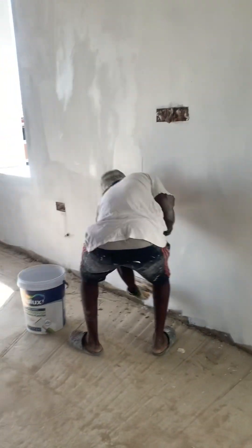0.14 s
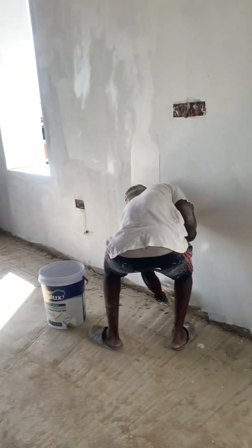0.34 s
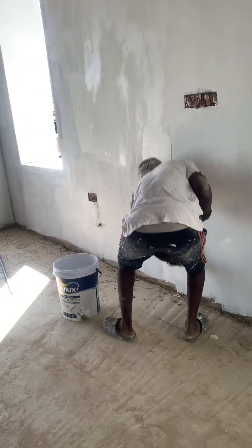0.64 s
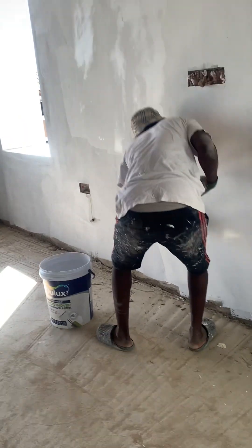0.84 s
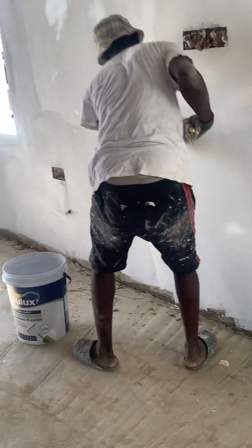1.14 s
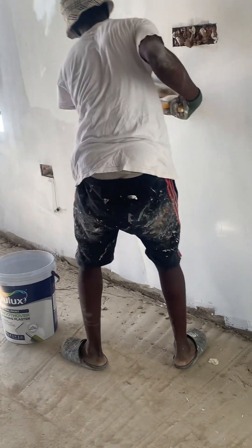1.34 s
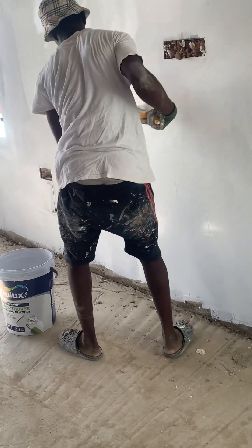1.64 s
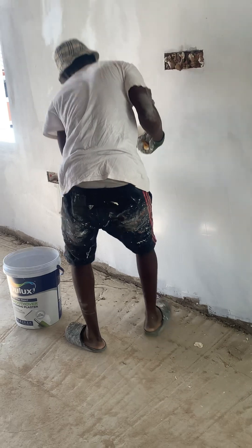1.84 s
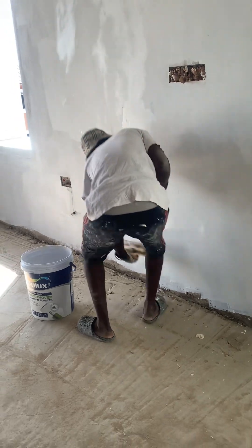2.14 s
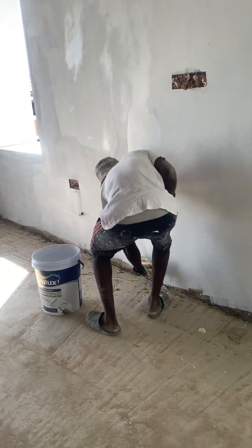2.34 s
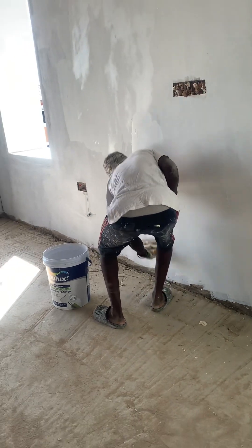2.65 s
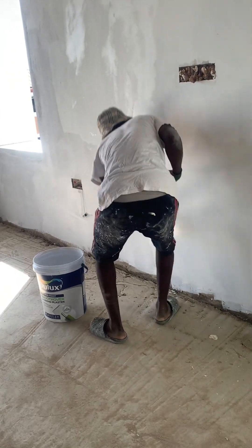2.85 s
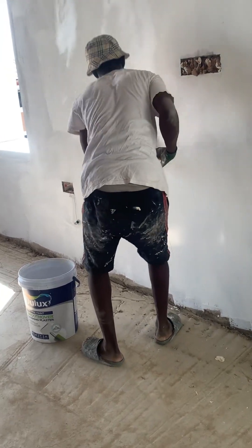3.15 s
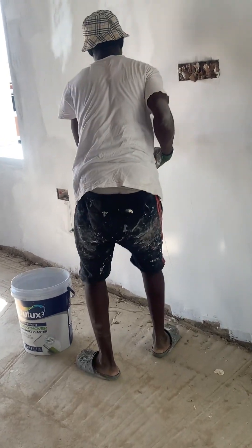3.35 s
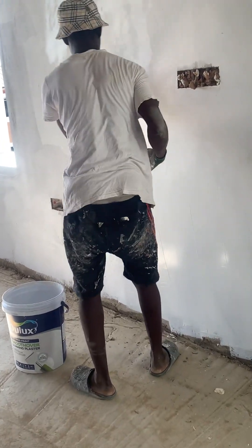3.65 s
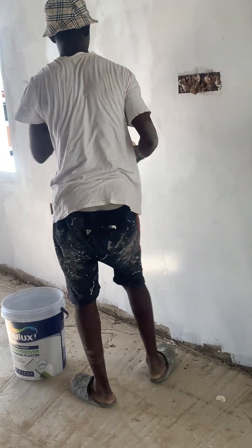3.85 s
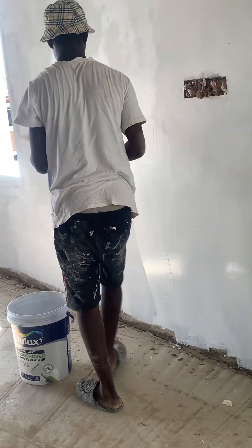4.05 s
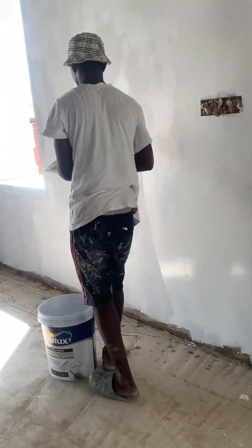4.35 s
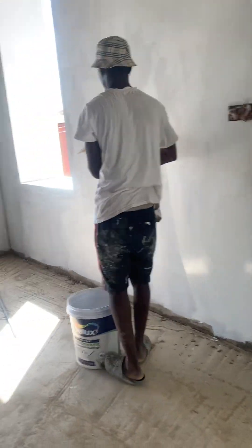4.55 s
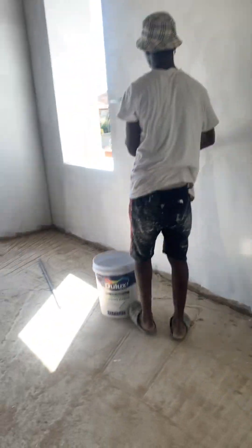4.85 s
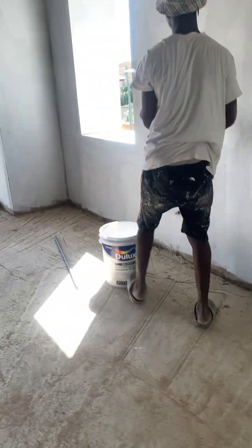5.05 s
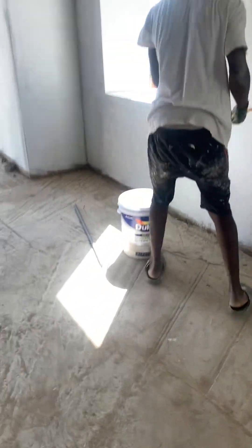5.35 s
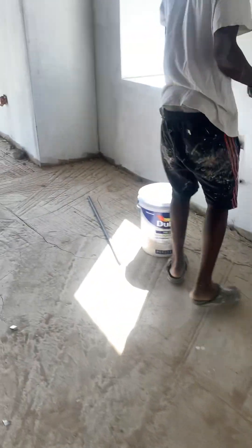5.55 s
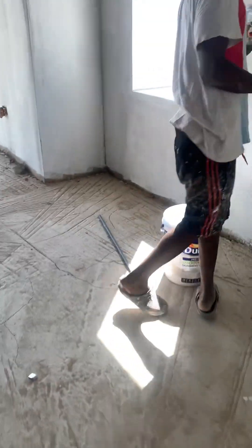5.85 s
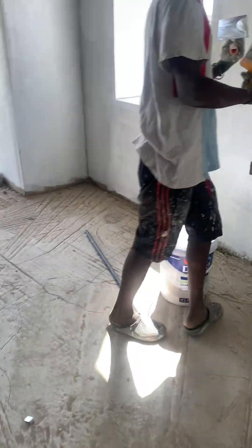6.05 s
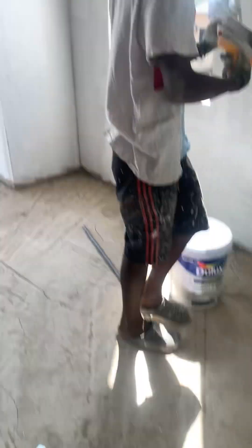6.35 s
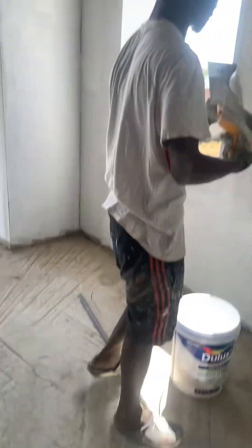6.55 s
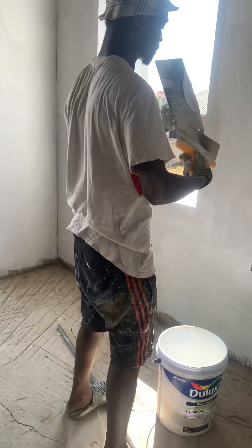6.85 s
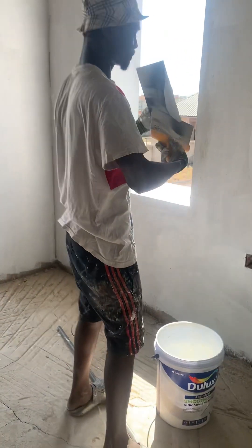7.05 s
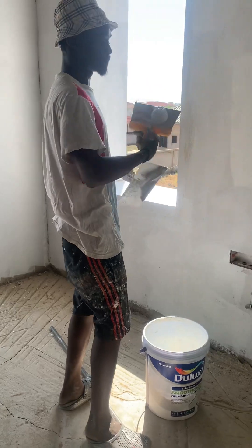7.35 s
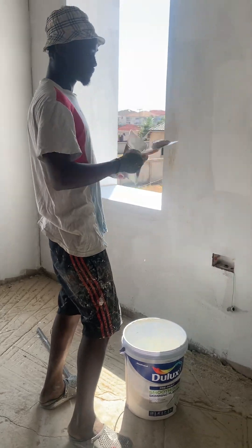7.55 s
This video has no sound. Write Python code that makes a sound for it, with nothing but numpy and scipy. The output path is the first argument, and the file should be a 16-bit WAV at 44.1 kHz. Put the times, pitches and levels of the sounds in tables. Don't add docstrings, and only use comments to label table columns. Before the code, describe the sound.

Close, dry scraping of a plastering blade in a bare room, sharp ticks between passes, then a hollow plastic bucket drag and more rasping.

```python
import sys
import numpy as np
from scipy import signal
from scipy.fft import rfft, irfft, next_fast_len
from scipy.io import wavfile
from scipy.ndimage import uniform_filter1d, map_coordinates

SR = 44100
rng = np.random.default_rng(int(sys.argv[2]) if len(sys.argv) > 2 else 0)


def wav_out(sig):
    wavfile.write(sys.argv[1], SR, np.round(np.clip(np.atleast_2d(sig).T, -1, 1) * 32767).astype(np.int16))


def how_loud(loudness_db):
    steps = np.asarray(loudness_db, float) / 20
    return 10 ** steps


N = 339570

# (frequency [Hz], level per Hz [dB])
STREET = [(60, -31), (120, -3), (250, -5.5), (450, -12), (1000, -20.5), (2500, -28), (8000, -41.5),
          (15500, -58.5)]


def unit(x):
    return x / np.sqrt(np.mean(x ** 2) + 1e-20)


def along(points, hz):
    f, v = np.transpose(points)
    return np.interp(np.log(hz + 1), np.log(f + 1), v)


def curves(rows):
    s, *cols = np.transpose(rows)
    return [np.interp(np.arange(N) / SR, s, c) for c in cols]


def wobble(rate):
    knots = rng.standard_normal(int(N * rate / SR) + 4)
    return map_coordinates(knots, [np.arange(N) * rate / SR])


def filtered(x, response):
    m = next_fast_len(N + SR // 5)
    return irfft(rfft(x, m) * response(np.fft.rfftfreq(m, 1 / SR)), m)[..., :N]


def coloured(x, spectrum):
    return unit(filtered(x, lambda hz: how_loud(along(spectrum, hz))))


def resonant(x, modes):
    def body(f):
        total = 0
        for k, (centre, width, db) in enumerate(modes):
            damping = 1j * f * width
            total = total + (-1) ** k * how_loud(db) * damping / (centre * centre - f * f + damping)
        return total
    return unit(filtered(x, body))


def trowel():
    # (frequency [Hz], width [Hz], level [dB])
    wall_modes = [(544, 217, -4.5), (872, 188, 1), (1103, 114, 4), (1363, 500, -4.5)]
    blade_modes = [(1774, 670, -2), (2230, 474, 2), (2815, 716, 1.5), (3270, 820, 3.5), (4135, 1240, -0.5)]
    # (frequency [Hz], level per Hz [dB])
    rasp_colour = [(2500, -24), (4000, -5.5), (5000, -1.5), (6500, -3.5), (7900, -4.5), (8600, -11.5),
                   (15000, -62)]
    dust_colour = [(7400, -32), (8200, -2.5), (9500, 0.5), (12000, -4), (15000, -1.5), (15600, -22),
                   (15900, -66)]
    # (touch [s], rise [s], fall [s], peak [dB], hum
    # against the rasp [dB])
    sifts = [(4.37, .06, .12, -38.5, 0), (1.223, 0.19, 0.14, -38, 2), (4.245, 0.031, 0.22, -34, 0),
             (4.46, 0.035, 0.24, -32.5, 0), (6.185, .02, 0.047, -60, -2), (6.305, .015, .06, -57, 0),
             (4.99, 0.067, 0.051, -26, 0), (7.0, 0.14, 0.28, -42, -4), (7.16, 0.057, 0.048, -35, 0),
             (7.465, 0.013, 0.036, -38, 3), (3.46, 0.098, 0.13, -34, 0), (3.74, 0.021, 0.1, -30, 3)]
    flexes = [(0.18, 0.067, .12, -49, 0), (2.471, .001, 0.035, -47, -4), (2.544, .002, 0.032, -48, -6),
              (4.38, 0.17, 0.22, -44, -2), (1.55, 0.13, 0.089, -36, 2), (1.365, 0.059, 0.13, -32.5, 2),
              (5.12, 0.13, 0.18, -27, 1.5), (5.45, 0.065, 0.079, -41.5, 2), (5.727, 0.031, 0.22, -33, 11.5),
              (6.553, 0.029, 1, -37, 3.5), (6.62, 0.26, 0.22, -30.5, 5)]

    catch = how_loud(0.74 * wobble(45) + 0.8 * wobble(160))
    grains = grit(scatter_db=2.0, patchy_db=1.1)
    apart = [np.roll(grains, k * N // 5) for k in range(5)]
    rasp = how_loud(1.0) * pressure((1, 1), 0) * coloured(apart[0], rasp_colour)
    dust = how_loud(-1) * pressure((0.77, 1.05), 0.069, sifts) * coloured(apart[1], dust_colour)
    wall = how_loud(-2.5) * pressure((0.73, 0.75), 0.86) * resonant(apart[2], wall_modes)
    blade = how_loud(0.0) * pressure((0.64, 0.97), 0.4, flexes) * resonant(apart[3], blade_modes)
    thrum = how_loud(-21.5) * pressure((0.18, 0.65), 0) * coloured(apart[4], STREET)
    return unit(catch) * (rasp + dust + wall + blade + thrum)


def pressure(grows, hums, extra=()):
    # (touch [s], rise [s], fall [s], peak [dB], hum against the rasp [dB])
    strokes = [(0.0, 0.005, 0.82, -67, 12.5), (0.826, 0.045, 0.24, -40, -0.5),
               (0.94, 0.098, 0.22, -36.5, -1), (1.21, 0.2, 0.11, -48, 14), (1.362, 0.07, 0.44, -30, 0),
               (2.592, 0.042, 0.37, -39.5, 15.5), (2.68, 0.22, 0.29, -30, 3.5),
               (2.93, 0.098, 0.12, -39, 10), (2.85, .025, .05, -31, -3), (3.1, 0.13, 0.28, -54.5, 23),
               (4.3, 0.037, 0.2, -59, 29.5), (4.44, 0.14, .15, -48.5, 16.5), (4.6, 0.14, 0.56, -36.5, 13),
               (4.93, 0.14, 0.21, -32, 7.5), (5.1, 0.17, 0.24, -28.5, -5), (5.703, 0.16, 0.33, -29, 1),
               (6.15, .05, 1, -61, 5), (6.555, 0.11, 0.29, -37, 6.5), (6.65, 0.22, 0.28, -29.5, -9),
               (6.84, 0.069, 0.13, -26, -9.5), (7.07, 0.085, 0.23, -43, -5.5)]
    swipes = [(0.19, 0.041, 0.11, -44, -1.5), (0.33, 0.048, 0.12, -57, 10.5), (0.79, 0.031, .05, -51, -19),
              (0.428, 0.013, 0.39, -54.5, 9.5), (0.55, 0.026, 0.54, -56, 18),
              (1.88, 0.056, 0.054, -52.5, -2), (2.117, 0.0037, 0.11, -58, 3),
              (2.471, .001, 0.074, -58.5, 29.5), (2.543, 0.0054, 0.17, -54.5, 17.5),
              (3.375, 0.007, 0.07, -47, 16.5), (3.43, 0.071, 0.63, -44, 1.5),
              (3.527, 0.009, 0.23, -35.5, 2), (3.68, 0.11, 0.095, -33, 0), (3.85, 0.068, 0.17, -30, -1),
              (4.058, 0.074, 0.12, -31.5, -1.5), (4.2, 0.071, 0.078, -34, 4.5),
              (4.55, 0.012, 0.13, -29.5, -4), (5.45, 0.07, 0.2, -47, 1), (7.18, 0.034, 0.069, -37.5, -8),
              (7.28, 0.025, 0.18, -52, -2), (7.397, 0.0038, 0.24, -64, 23), (7.46, 0.028, 0.039, -52, -11)]
    stroke_dome, swipe_dome = 1.9, 1.32
    touch_db, lift_off_db = 22, 30
    bite_share, trail = 0.13, 1
    step = 40

    s = np.arange(0, N + step, step) / SR
    power = np.zeros(len(s)) + how_loud(-84) ** 2
    for rows, dome in ((strokes, stroke_dome), (swipes, swipe_dome), (extra, stroke_dome)):
        for touch, rise, fall, db, hum_db in rows:
            swell = np.clip(1 - (s - touch) / rise, 0, 1)
            fade = np.maximum(s - touch - rise, 0) / fall
            press_loss = grows[0] * touch_db * swell ** dome
            lift_db = lift_off_db * (np.minimum(fade, 1) ** dome + trail * np.maximum(fade - 1, 0))
            bite = np.clip((s - touch) / (bite_share * rise), 0, 1)
            power += (bite * how_loud(db + hums * hum_db - press_loss - grows[1] * lift_db)) ** 2
    return np.interp(np.arange(N) / SR, s, np.sqrt(power))


def grit(scatter_db, patchy_db):
    size_db = scatter_db * np.minimum(rng.exponential(size=N), 6)
    hail = rng.standard_normal(N) * how_loud(size_db)
    z = signal.stft(hail, nperseg=512)[2]
    field = uniform_filter1d(rng.standard_normal(z.shape), size=5, axis=0)
    field = uniform_filter1d(field, size=5, axis=1)
    return signal.istft(z * how_loud(patchy_db * unit(field)), nperseg=512)[1][:N]


def rubs():
    # (start [s], length [s], frequency [Hz], width [Hz], level [dB])
    narrow_rubs = [(0.428, 0.06, 1040, 160, -39), (.47, 0.088, 1140, 60, -48), (0.572, 0.052, 970, 55, -33),
                   (.622, 0.032, 900, 78, -37), (.735, 0.03, 900, 80, -50), (0.827, 0.074, 2150, 93, -48),
                   (.86, .035, 1850, 92, -41), (1.08, 0.045, 1080, 100, -35.5),
                   (1.372, 0.08, 1060, 240, -27), (1.459, 0.086, 1000, 170, -34.5),
                   (1.66, 0.07, 870, 190, -35), (1.402, 0.16, 548, 130, -36), (2.59, 0.14, 580, 56, -36),
                   (2.629, 0.09, 1060, 60, -29), (2.868, 0.015, 3360, 45, -25), (3.04, 0.088, 668, 20, -37),
                   (3.129, 0.035, 1170, 120, -34), (3.185, 0.04, 1144, 70, -29),
                   (3.24, 0.047, 1150, 130, -32.5), (2.699, 0.075, 825, 100, -32),
                   (4.649, 0.48, 767, 38, -36), (5.202, 0.18, 850, 330, -33),
                   (6.198, 0.043, 248, 30.5, -36), (6.24, 0.12, 117, 6.6, -43.5),
                   (6.642, 0.13, 875, 24, -41.5), (7.176, 0.036, 1090, 200, -40),
                   (7.226, 0.028, 1120, 91, -38), (7.397, 0.038, 1040, 250, -44),
                   (2.11, 0.27, 3250, 170, -64.5), (2.47, .012, 2000, 450, -41),
                   (5.171, 0.18, 2150, 600, -32), (5.73, 0.053, 600, 150, -33),
                   (5.807, 0.035, 2260, 60, -34), (5.85, 0.17, 1620, 220, -35),
                   (6.66, 0.15, 1300, 540, -37.5), (6.76, 0.2, 3400, 600, -30),
                   (6.917, 0.07, 1710, 120, -35.5), (7.17, 0.06, 14800, 1100, -39),
                   (5.758, .2, 3760, 300, -30.5), (4.481, 0.19, 730, 83, -34),
                   (.64, .06, 1170, 120, -45), (0.54, .03, 850, 80, -44), (.685, .05, 1080, 80, -43),
              (1.41, .2, 3900, 600, -38), (4.6, .5, 1400, 600, -36), (.575, .04, 580, 89, -39),
              (.525, .04, 1060, 90, -50), (1.15, .06, 1000, 150, -41.5), (1.22, 0.082, 1000, 170, -54),
              (1.7, 0.045, 1050, 200, -40), (1.4, .035, 1000, 250, -38), (3.6, .05, 910, 150, -36.5),
              (5.01, .15, 830, 55, -36), (5.23, .13, 720, 40, -37.5), (4.72, .08, 1150, 60, -37),
              (4.38, .09, 870, 100, -44), (2.73, .07, 1130, 87, -36), (2.82, .05, 900, 80, -37),
              (2.9, 0.098, 1180, 100, -35), (2.86, .12, 1760, 110, -36), (3.04, 0.088, 890, 70, -36.5),
              (3.19, 0.1, 860, 65, -41), (3.0, .05, 1350, 90, -39), (6.77, 0.055, 1500, 200, -39)]
    jolts = [
        (4.7, 0.075, 226, 18, -24),
        (4.812, 0.025, 254, 33, -23),
        (4.851, 0.064, 286, 31, -25),
        (4.924, .065, 293, 13, -23),
        (5.002, .022, 222, 33, -20),
        (5.033, 0.016, 226, 25, -20),
        (4.5, .13, 232, 12, -34),
        (5.152, 0.027, 222, 30, -25),
        (5.2, 0.14, 240, 7.8, -30),
    ]
    evenness = 0.86
    slacken_db = 4

    out = np.zeros(N + SR)
    wander = np.pad(0.025 * wobble(18), (0, SR))
    for s, length, hz, width_hz, db in narrow_rubs + jolts:
        start = round(s * SR)
        t = np.arange(next_fast_len(round((length + .15) * SR))) / SR
        resonance = signal.iirpeak(hz, hz / width_hz, SR)
        ring = signal.hilbert(signal.lfilter(*resonance, rng.standard_normal(len(t)))[::-1])
        moving_hz = hz * (hz > 400)
        ring = ring * np.exp(2j * np.pi * moving_hz * np.cumsum(wander[start:][:len(t)]) / SR)
        take_hold = np.clip(t / (0.05 * length + 1.6 / hz), 0, 1)
        fade_db = -slacken_db * np.minimum(t / length, 1) - 60 * np.maximum(t - length, 0) / 0.049
        slide = unit(ring.real / (abs(ring) + ring.real.std()) ** evenness)
        out[start:][:len(t)] += how_loud(db) * slide * take_hold * how_loud(fade_db)
    return out[:N] * how_loud(1.3 * wobble(35))


def ticks():
    # (time [s], peak [dB], body [dB])
    contacts = [(0.1735, -32, -13), (.163, -35, -15), (.3551, -45, -10), (.4035, -46, -10),
                (.5457, -41, -10), (.8101, -41.5, -10), (3.494, -28, -15), (4.4702, -31, -20),
                (5.7104, -34, -8.5), (5.7264, -27, -12), (.71, -38, -10), (1.036, -19.5, -8.5),
                (2.348, -58, -20), (2.365, -56, -20), (3.717, -26, -14.5), (0.428, -35, 0),
                (0.575, -30.5, 6), (0.83, -28, -8), (2.591, -36, -1), (3.5276, -16.5, -13),
                (7.468, -39, -20), (3.375, -34, -15), (.302, -44, -15), (.49, -40, -10), (7.3652, -34, -18),
                (1.369, -19.5, -6), (1.917, -31.5, -19), (2.1166, -43, -15), (2.2453, -43, -11),
                (2.2528, -44, -11), (2.3989, -55, 8), (2.4713, -36, 2), (2.544, -33.5, 0), (3.1854, -48, 4),
                (3.3822, -24, -15), (3.4717, -31, -15), (4.0592, -22.5, -9), (4.197, -27.5, 8.5),
                (4.2398, -14.5, -25), (5.5098, -36, 2), (6.194, -30.5, -15), (6.3144, -40.5, -10.5),
                (6.4777, -38, -12), (6.5555, -43, 6), (7.3477, -33.5, -21), (7.3972, -43, 11),
                (7.4759, -29.5, -20)]
    snap = 1.2
    crack_t60, spray_t60, spray_share = 0.0033, 0.039, 0.5

    crack, knock = np.zeros(N + SR), np.zeros(N + SR)
    t = np.arange(SR // 5) / SR
    for s, db, body_db in contacts:
        start = round(s * SR)
        grains = rng.standard_normal(len(t))
        grains[:2] = snap, snap / 2
        burst = grains * (1.3 * how_loud(-60 * t / crack_t60) + spray_share * how_loud(-60 * t / spray_t60))
        crack[start:][:len(t)] += how_loud(db - 2.0) * burst
        knock[start:][:len(t)] += how_loud(db + body_db + 11.5) * burst
    bright = signal.butter(2, [1700, 11000], "band", fs=SR, output="sos")
    dull = signal.butter(2, [420, 1030], "band", fs=SR, output="sos")
    return signal.sosfilt(bright, crack[:N]) + signal.sosfilt(dull, knock[:N])


def tap():
    # (time [s], peak [dB])
    knocks = [
        (7.064, -19.5),
    ]
    # (frequency [Hz], level [dB], t60 [s])
    hawk_modes = [(187, -18, 0.04), (240, -4.5, 0.047), (483.5, 4.5, 0.037), (1000, 8, 0.013),
                  (1300, -17, 0.017)]
    out, t = np.zeros(N + SR), np.arange(SR // 5) / SR
    for s, db in knocks:
        ring = sum(how_loud(level - 60 * t / t60) * np.sin(2 * np.pi * hz * t) for hz, level, t60 in hawk_modes)
        out[round(s * SR):][:len(t)] -= how_loud(db + 0.5) * ring * (1 - np.exp(-t / 0.0016))
    return out[:N]


def bucket():
    # (time [s], level [dB])
    drag = [(4.35, -72), (4.46, -46), (4.5, -33), (4.7, -29), (4.9, -27), (5.06, -28), (5.13, -29.5),
            (5.3, -40.5), (5.55, -53.5)]
    # (frequency [Hz], width [Hz], level [dB])
    bucket_modes = [(110, 35, -9.5), (171, 24, -9), (232, 20, 0), (292, 25, -7), (367, 100, -10.5)]
    s = np.arange(N) / SR
    sliding = (s > drag[0][0]) & (s < drag[-1][0])
    stutter = rng.standard_normal(N) * how_loud(0.84 * wobble(45))
    return sliding * how_loud(curves(drag)[0] + 0.5) * resonant(stutter, bucket_modes)


def bumps():
    # (time [s], peak [dB], start pitch [Hz], end pitch [Hz], t60 [s])
    swings = [
        (0.56, -18.5, 304, 50.3, 0.18),
        (0.723, -23.5, 242, 55.3, 0.2),
        (.958, -29.5, 348, 120, 0.11),
        (4.202, -24.5, 302, 61, 0.21),
        (5.499, -29, 110, 52.1, 0.34),
        (5.671, -26.5, 99, 70, 0.16),
        (5.892, -26, 147, 80, 0.11),
        (6.189, -24, 338, 120, 0.076),
        (7.525, -27, 110, 50.75, 0.27),
        (7.61, -28.5, 110, 59.8, 0.29),
    ]
    out, t = np.zeros(N + SR), np.arange(SR // 4) / SR
    for s, db, start_hz, end_hz, t60 in swings:
        hz = end_hz + (start_hz - end_hz) * np.exp(-t / 0.0064)
        swing = np.sin(2 * np.pi * np.cumsum(hz) / SR)
        fade = how_loud(-60 * t / t60) * np.exp(-(t / (0.17 * t60)) ** 4)
        out[round(s * SR):][:len(t)] += how_loud(db - 3.0) * swing * fade * (1 - np.exp(-t / 0.00027))
    return out[:N]


def room(x):
    # (frequency [Hz], t60 [s])
    decay = [(200, 0.19), (1500, 0.32), (6000, 0.34), (14000, 0.1)]
    hz, t, z = signal.stft(rng.standard_normal(SR), SR, nperseg=256)
    tail = signal.istft(z * how_loud(-60 * t / along(decay, hz)[:, None]), SR, nperseg=256)[1]
    late = np.pad(x, (300, 0))
    return signal.fftconvolve(late, tail / np.linalg.norm(tail))[:N]


def engine():
    # (time [s], shaft speed [Hz], second order [dB], fourth order [dB])
    run = [(5.4, 51, -73, -85), (5.7, 51.8, -72, -56), (6.1, 51.3, -57.5, -39.5), (6.5, 47.77, -62, -44.5),
           (6.9, 46.56, -67, -58), (7.07, 51.85, -54, -63), (7.12, 53, -43.5, -59), (7.3, 53.6, -47.5, -45),
           (7.7, 56.5, -57, -82.5)]
    # (multiple of shaft speed, level against the second order [dB])
    orders = [(1, -11), (2, 2.5), (3, -12.5)]
    hz, low_db, fourth_db = curves(run)
    turn = 2 * np.pi * np.cumsum(hz * (1 + 0.0078 * wobble(20))) / SR
    low = sum(how_loud(level + 1.1 * wobble(9)) * np.sin(k * turn) for k, level in orders)
    fourth = how_loud(fourth_db - 3.5 + 1.4 * wobble(12)) * np.sin(4 * turn + 1.3 * wobble(25))
    return how_loud(low_db + 5.0) * low + fourth


def bird():
    # (start [s], length [s], start pitch [Hz], end pitch [Hz], level [dB])
    whistles = [
        (0.099, .016, 7300, 6000, -59),
        (2.039, 0.016, 8600, 8340, -76),
        (2.075, .02, 9300, 8860, -94),
        (2.17, .02, 9400, 9000, -60),
        (2.225, 0.03, 9300, 9100, -68),
        (2.408, 0.071, 3640, 3720, -61.5),
    ]
    out, t = np.zeros(N + SR), np.arange(SR // 4) / SR
    for s, length, start_hz, end_hz, db in whistles:
        part = np.clip(t / length, 0, 1)
        hz = start_hz + (end_hz - start_hz) * part + 400 * rng.standard_normal(len(t))
        turn = 2 * np.pi * np.cumsum(hz) / SR
        out[round(s * SR):][:len(t)] += how_loud(db + 6.5) * np.sin(np.pi * part) * np.sin(turn)
    return out[:N]


def background():
    # (time [s], level [dB])
    grasp = [(0, -57.5), (1.5, -59), (2.3, -52.5), (3.4, -62), (4.2, -54.5), (5.4, -51), (5.7, -46.5),
             (6.2, -54), (7.3, -49.5), (7.7, -46)]
    # (frequency [Hz], level per Hz [dB])
    handling_colour = [(20, -44), (35, -10), (55, -2), (90, -5), (140, -20), (250, -54)]
    # (time [s], level [dB])
    traffic = [(0, -50), (1, -48), (1.9, -47.5), (2.3, -49), (2.7, -41), (3.3, -48), (3.9, -44.5),
               (4.5, -44.5), (5.5, -53.5), (5.95, -38.5), (6.4, -47), (6.9, -47), (7.3, -49), (7.7, -44.5)]
    handling = coloured(rng.standard_normal(N), handling_colour)
    handling = how_loud(curves(grasp)[0] + 2.0 * wobble(13)) * handling
    street = coloured(grit(scatter_db=-0.1, patchy_db=3.0), STREET)
    return handling + how_loud(curves(traffic)[0] + 0.23 * wobble(8.2)) * street


def scene():
    near = trowel() + rubs() + ticks() + bucket()
    air = near + how_loud(-10) * room(near) + engine() + bird() + background()
    z = signal.stft(air, nperseg=1024)[2]
    scattered = signal.istft(z * np.exp(2j * np.pi * rng.random(z.shape)), nperseg=1024)[1][:N]
    # Hz, dB
    share_db = [(60, -8.5), (600, -0.5), (1400, -1.0), (2400, 0.0), (4200, -2.5), (15000, -6.0)]
    mono = air + bumps() + tap()
    return np.array([mono + filtered(scattered, lambda hz: how_loud(along(share_db, hz))), mono])


def widen(dry):
    # (frequency [Hz], level [dB])
    left_db = [(60, 0), (200, -3), (600, -6), (900, -5.5), (1400, -1.5), (2400, -6), (3300, -0.1),
               (4400, 1)]
    # (frequency [Hz], phase ahead [rad])
    left_turn = [(0, -.25), (500, -.9), (1100, -.2), (1650, .2), (2500, 1.65), (3300, 1.4), (4700, 3.14),
                 (16000, 19.74)]

    def response(hz):
        return how_loud(along(left_db, hz)) * np.exp(1j * np.interp(hz, *np.transpose(left_turn)))
    return np.array([how_loud(0.0) * filtered(dry[0], response), how_loud(1.5) * dry[1]])


def lose_bands(stereo):
    # (from [Hz], to [Hz])
    sum_lost = [(4300, 5120), (8400, 9550), (12550, 13700), (15620, 17000)]
    difference_lost = [(6300, 7550), (10350, 11700), (14500, 17000)]
    attacks = [.174, 2.12, 2.24, 2.35, 2.471, 3.382, 3.465, 3.53, 4.074, 4.232, 5.692, 5.72, 6.478, 7.35,
               7.478]
    left, right = stereo
    pair = np.array([left + right, left - right]) / 2

    def above(hz, edge):
        return .5 + .5 * np.tanh((hz - edge) / 25)

    def inside(hz, bands, margin):
        return sum(above(hz, lo + margin) - above(hz, hi - margin) for lo, hi in bands)

    def lost(margin):
        return filtered(pair, lambda hz: np.array([inside(hz, sum_lost, margin),
                                                   inside(hz, difference_lost, margin / 4)]))

    narrow = np.clip(2.5 * wobble(14) - .6, 0, 1)
    dropped = narrow * lost(170) + (1 - narrow) * lost(-40)
    s = np.arange(N) / SR
    spared = sum(np.exp(-((s - at) / .014) ** 4) for at in attacks)
    mid, side = filtered(pair - dropped * (1 - spared), lambda hz: 1 - above(hz, 16500))
    return np.array([mid + side, mid - side])


def low_pass(x):
    return signal.sosfilt(signal.butter(12, 16640, fs=SR, output="sos"), x)


def record(dry):
    mix = lose_bands(widen(dry))
    return low_pass(mix)


dry = scene()
out = record(dry)
wav_out(out)
```